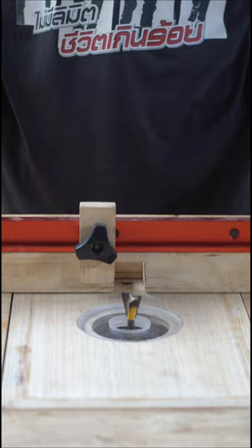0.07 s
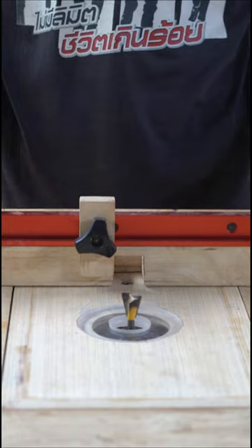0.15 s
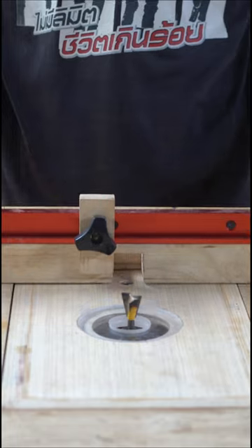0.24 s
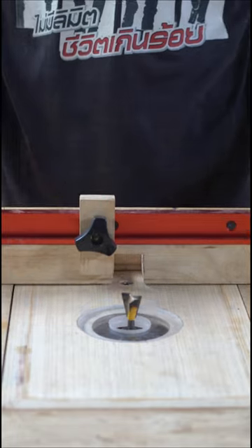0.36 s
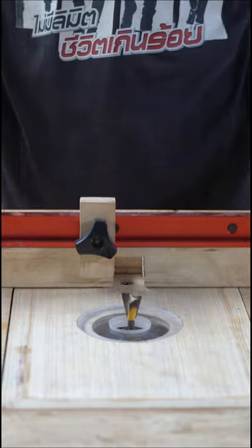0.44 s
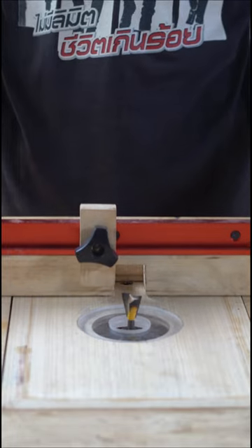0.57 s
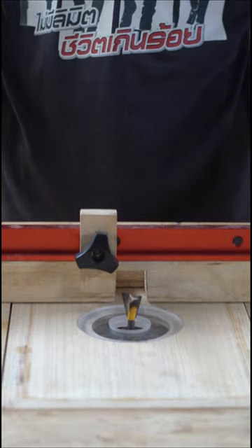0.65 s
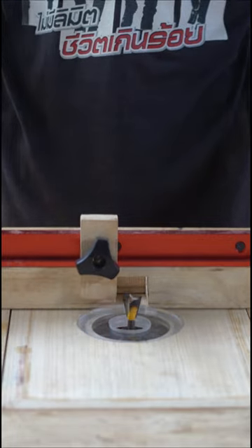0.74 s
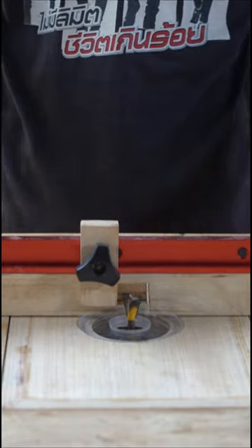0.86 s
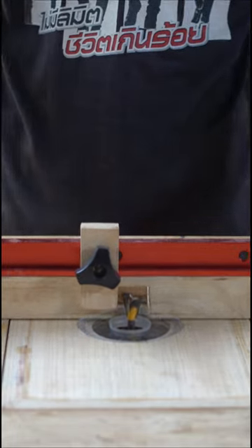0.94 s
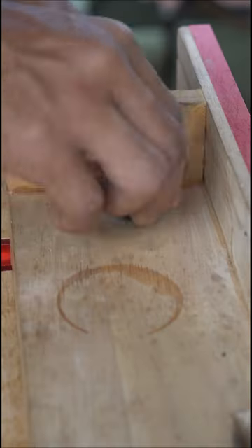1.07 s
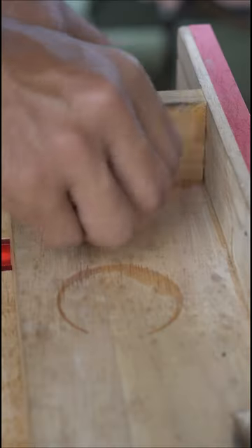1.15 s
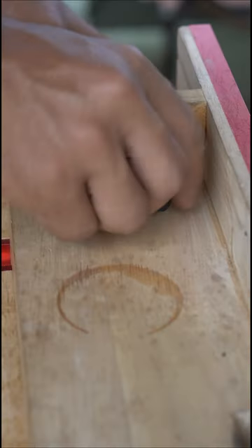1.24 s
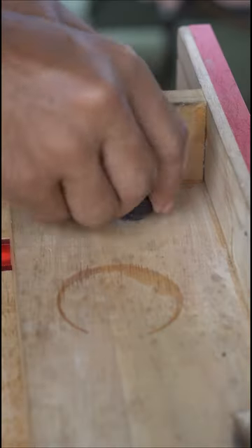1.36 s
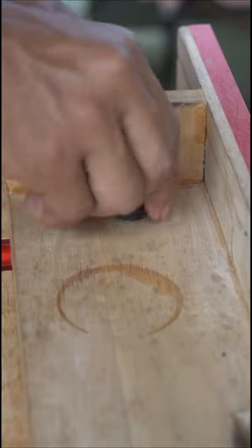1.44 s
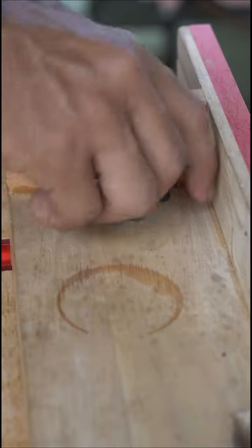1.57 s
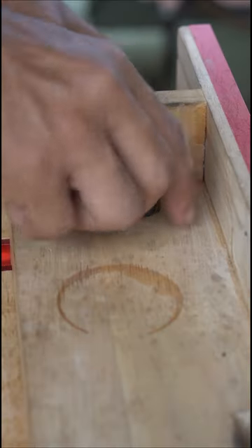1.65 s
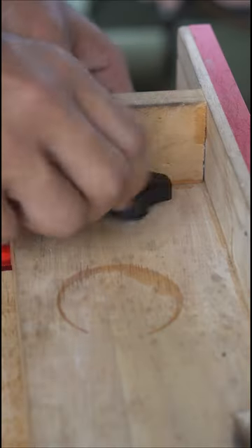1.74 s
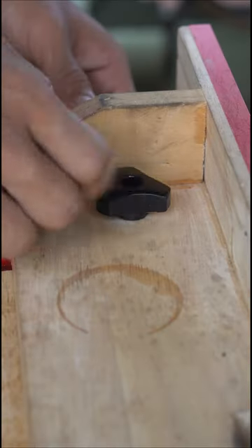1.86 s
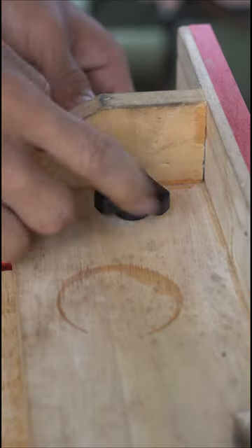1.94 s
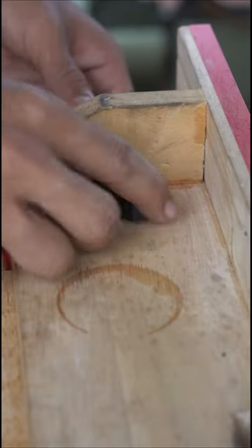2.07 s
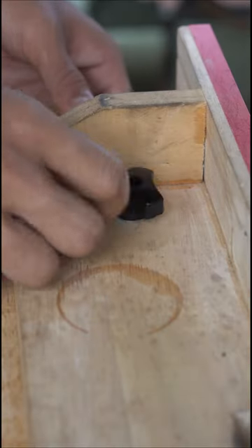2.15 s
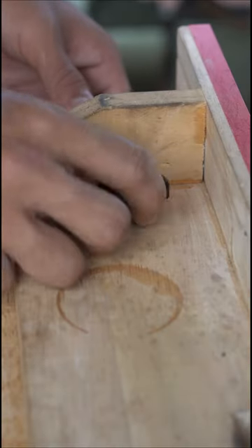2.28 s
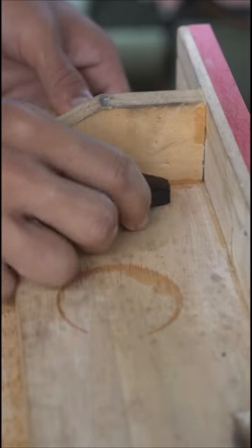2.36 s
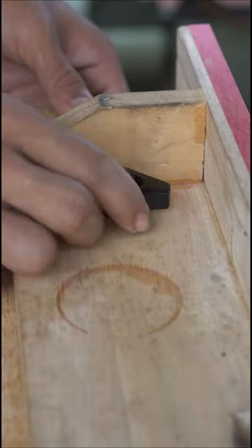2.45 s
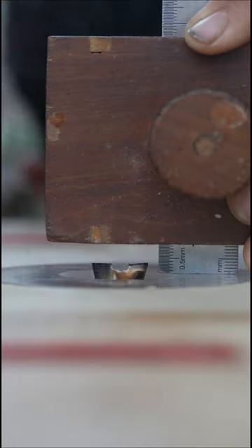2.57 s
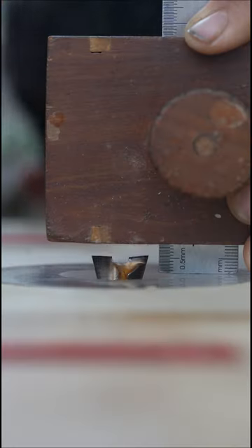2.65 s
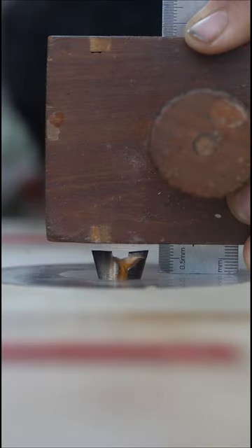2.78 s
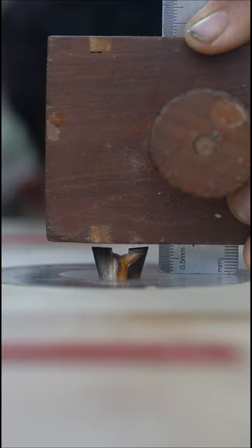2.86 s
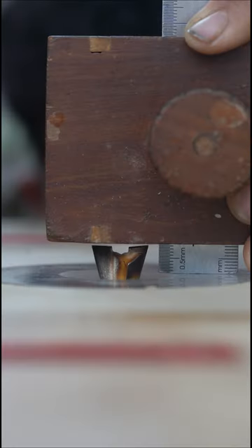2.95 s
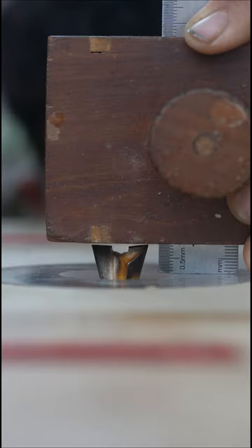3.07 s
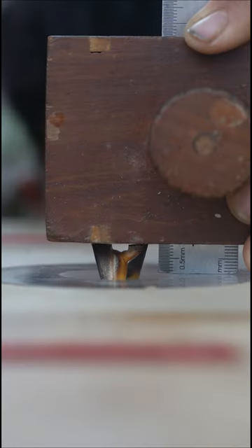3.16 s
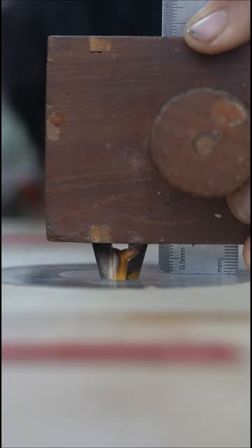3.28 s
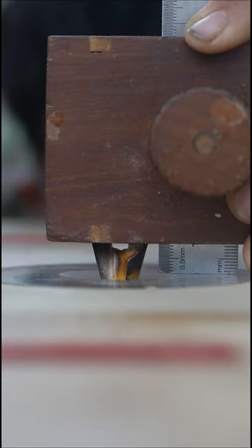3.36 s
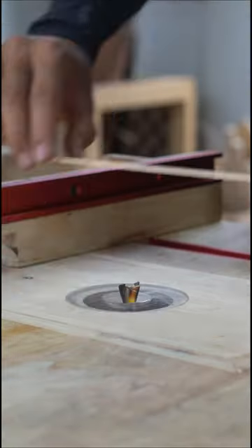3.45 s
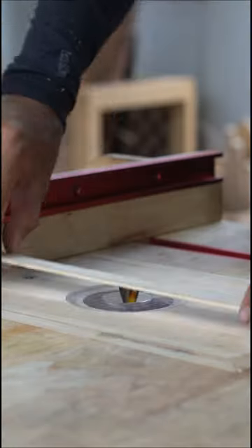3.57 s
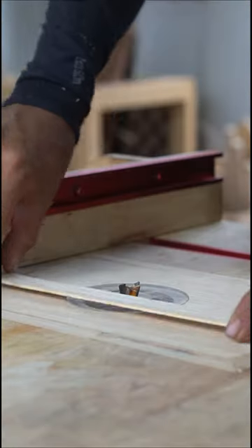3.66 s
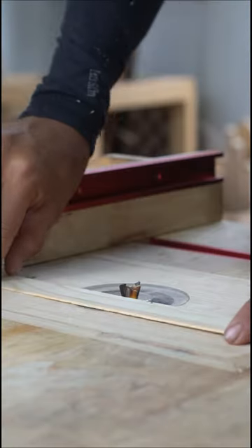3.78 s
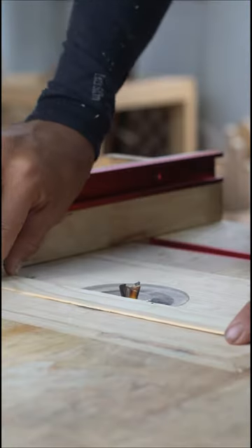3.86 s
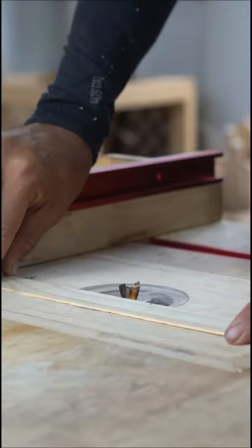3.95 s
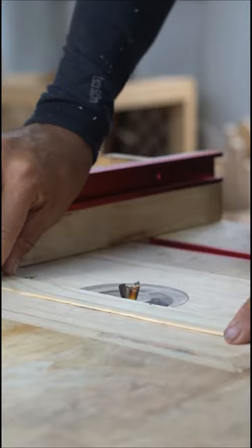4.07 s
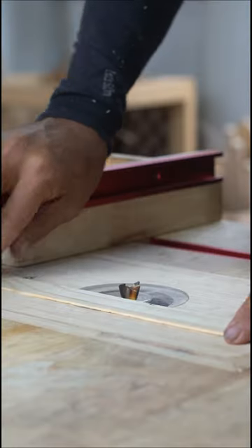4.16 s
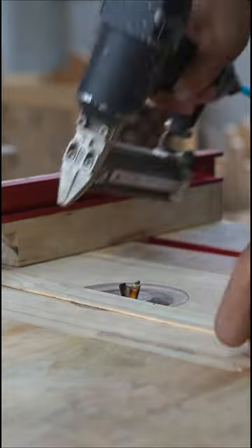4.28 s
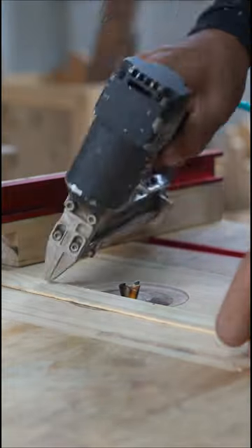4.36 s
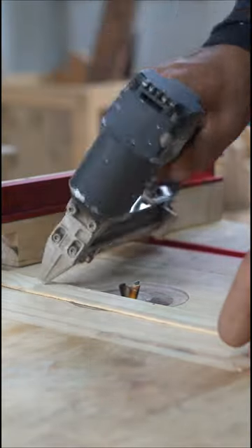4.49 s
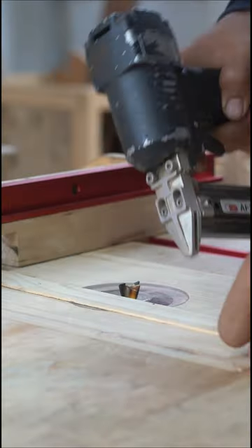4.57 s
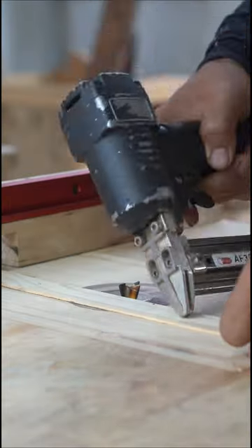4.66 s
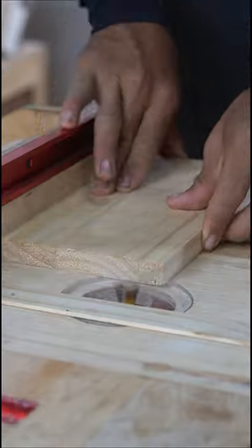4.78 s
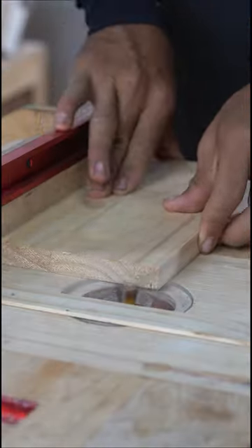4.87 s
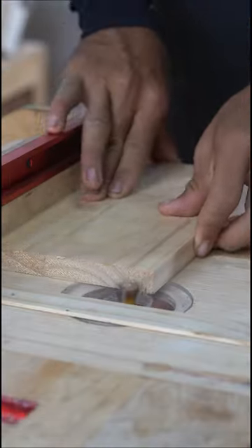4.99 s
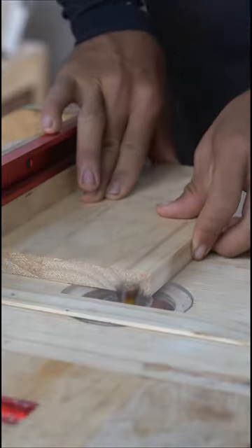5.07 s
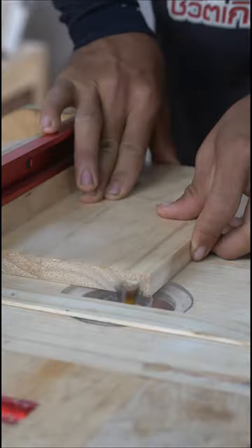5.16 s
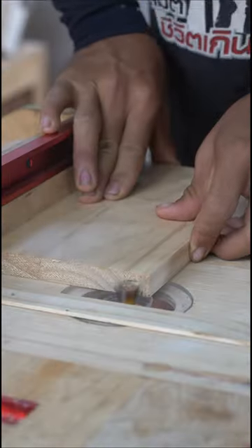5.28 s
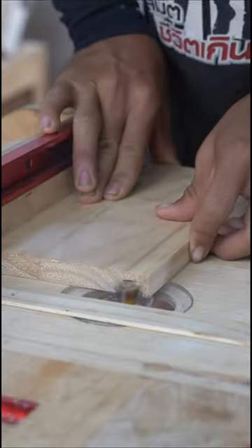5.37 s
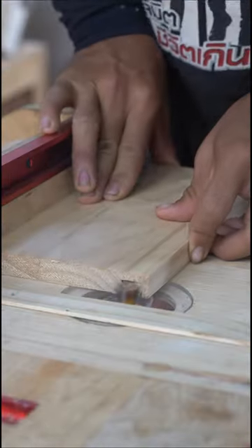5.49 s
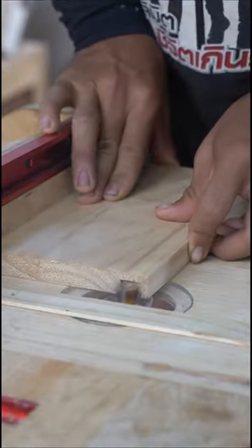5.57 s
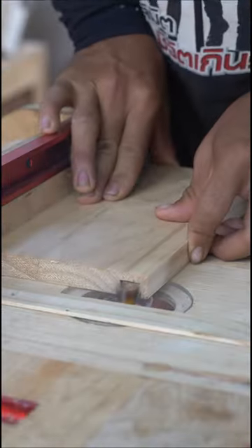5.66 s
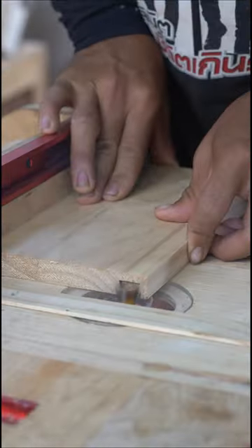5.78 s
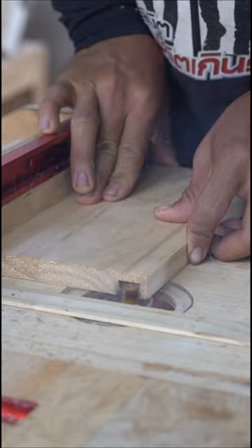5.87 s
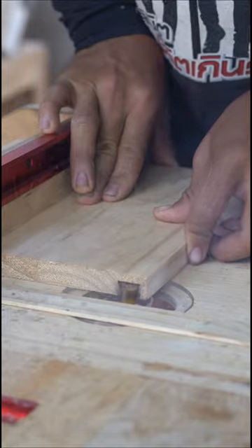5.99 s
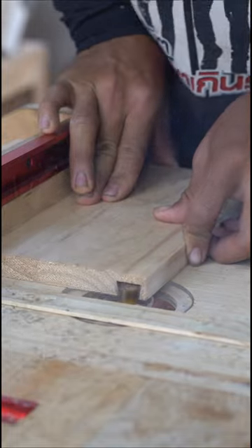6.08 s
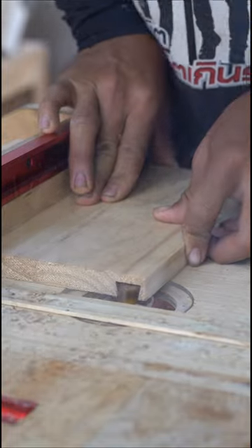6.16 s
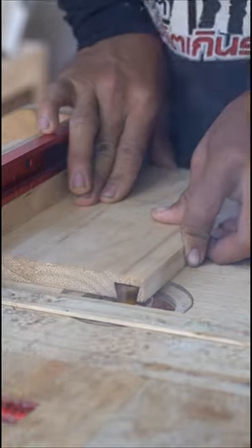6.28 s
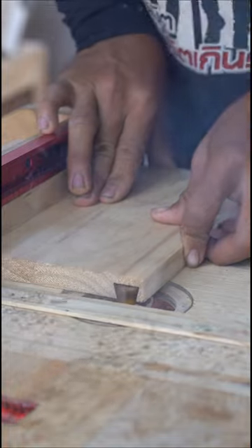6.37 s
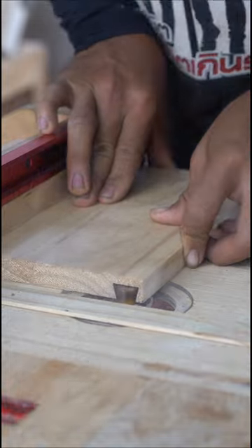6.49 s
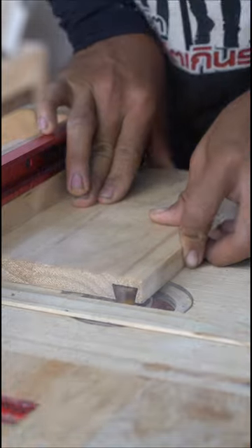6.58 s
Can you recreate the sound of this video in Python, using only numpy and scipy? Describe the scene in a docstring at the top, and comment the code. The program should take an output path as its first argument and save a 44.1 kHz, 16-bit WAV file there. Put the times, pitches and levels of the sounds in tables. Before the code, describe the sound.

Close mono sounds of a router table, in abruptly cut scenes: dry wood scraping, short knob clicks and rubbing, needle-thin squeaks with small steel rings, a light tap of a wood strip, and two hard nailer snaps. The final two seconds are far louder: a piercing motor whine in a rush of air and chips, dropping in pitch under load, then jumping higher and wavering deep in the cut.

```python
"""A router table is set up in a small workshop, then a dovetail slot is cut: a run of short scenes in mono.
First a fence rasps over the table as grainy bands of noise; then a clamp knob clicks with short noise bursts.
The bit squeaks in thin pure tones as it is raised, and a strip is tacked down with sharp cracks and a ping.
Last the router whines: tones locked to its two-flute bit, over a rush of air and chips, sag as it bites the board,
then sound deep in the slot, where the pitch rises and falls with the feed."""
import sys
import numpy as np
from scipy import signal
from scipy.fft import rfft, irfft, next_fast_len
from scipy.io import wavfile
from scipy.ndimage import uniform_filter1d

SR = 44100
rng = np.random.default_rng(int(sys.argv[2]) if len(sys.argv) > 2 else 0)


def bounce(signal):
    """Save signal as a 16-bit WAV file at the path given by the first command-line argument."""
    frames = np.transpose(np.atleast_2d(signal))
    limited = np.clip(frames, -1, 1)
    pcm = np.round(limited * 32767).astype(np.int16)
    wavfile.write(sys.argv[1], SR, pcm)


N = 292383  # samples
TIME = np.arange(N) / SR  # seconds

# Edges of the knob, gauge, strip and nailer scenes. Each entry: time in seconds; the last ends the nailer.
SCENE_EDGES = [1.104, 2.542, 3.501, 4.305, 4.781]
# Steady hiss of those four scenes. Each row: level in dB below 7 kHz, level in dB above.
SCENE_HISS = [(-49, -49), (-46.5, -45.5), (-45, -49.5), (-55, -55.5)]
# Tone colour of each scene's hiss. Each row: frequency in Hz, relative density in dB per Hz.
KNOB_COLOUR = [(88, -82), (150, -43.5), (422, -35), (675, -22), (979, -21), (1080, -15), (1260, -14),
               (1980, -8.5), (2360, -4), (3700, -3.5), (4000, -4.5), (5460, -4.5), (16000, -10.5)]
GAUGE_COLOUR = [(88, -84), (150, -46), (491, -19.5), (923, -17.5), (1100, -8), (1230, -13.5), (1770, -8.5),
                (1980, -5), (3390, -3.5), (6250, -5), (6880, -3), (14500, -1)]
STRIP_COLOUR = [(120, -73), (183, -27), (240, -50), (347, -30), (598, -20), (850, -17), (1230, -10),
                (1840, -4.5), (2160, -4.5), (2570, -4.5), (3990, -3), (4680, -7.5), (5200, -5),
                (16000, -17.5)]
NAILER_COLOUR = [(88, -99), (150, -73), (524, -32), (589, -33), (1120, -24), (1940, -15), (2550, -13.5),
                 (3160, -2), (3700, -11), (4410, -5), (5150, -10.5), (8900, -6.5), (16000, -12)]
# Hands and tools rub and lift the hiss.
# Each row: start in seconds, end in seconds, level in dB below 7 kHz, level in dB above.
RUBS = [(1.11, 2.175, -48.5, -54.5), (1.625, 2.17, -59, -49.5), (2.542, 2.696, -41.5, -33),
        (2.53, 2.915, -44, -38.5), (3.14, 3.183, -52, -40), (3.267, 3.38, -54, -46),
        (3.495, 3.53, -48, -44.5), (3.877, 3.92, -55, -48.5), (4.296, 4.54, -51.5, -49),
        (4.413, 4.48, -49.5, -55)]
# Narrow resonances in the hiss.
# Each row: start in seconds, end in seconds, centre in Hz, width in Hz, level in dB.
AIR_RESONANCES = [(0, 0.109, 6400, 220, -42), (0, 0.1, 9600, 700, -49), (0, 0.286, 3590, 200, -49),
                  (1.098, 2.54, 2440, 180, -68), (1.1, 1.8, 5450, 200, -66), (1.1, 1.797, 9900, 200, -63),
                  (3.507, 4.294, 1855, 180, -55.5), (3.5, 4.294, 2590, 170, -54.5),
                  (3.497, 4.302, 5140, 200, -59.5), (4.3, 4.784, 3280, 185, -69)]
# Faint hums of the workshop. Each row: start in seconds, end in seconds, frequency in Hz, mean level in dB.
HUMS = [(1.1, 1.9, 2298, -58), (1.49, 2.54, 1113, -71), (2.54, 3.5, 432, -79), (2.54, 3.3, 500, -78),
        (3.5, 4.3, 872, -68), (4.3, 6.63, 590, -85)]

# Tone colour of the sliding fence. Each row: frequency in Hz, relative density in dB per Hz.
FENCE_COLOUR = [(29, -78), (50, -28.5), (208, -21.5), (291, -2.5), (345, -10.5), (532, -1.5), (586, -1.5),
                (863, -5.5), (1470, -5), (2680, -8.5), (3500, -8), (5950, -11), (6870, -16.5), (11700, -24),
                (16000, -32.5)]
# Two pushes of the fence over the table.
# Each row: middle in seconds, half-length in seconds, then rumble, rasp and fine hiss levels in dB.
FENCE_PUSHES = [(0.05, 0.19, -72, -41, -53), (0.72, 0.22, -44.5, -39.5, -51.5)]
# Slow drag between pushes. The entries: rumble, rasp and fine hiss levels in dB.
FENCE_DRAG = (-44.5, -50.5, -55)
# Pitch of the fence's faint singing. Each row: time in seconds, frequency in Hz.
FENCE_SONG_PITCH = [(.28, 3490), (.5, 3310), (.72, 3144), (.92, 3540)]

# Sharp clicks of knob, gauge and nailer.
# Each row: time in seconds, ring level in dB, crack level in dB before halving, ring T60 in seconds, high edge in Hz.
CLICKS = [(1.193, -28, -32, 0.045, 10800), (1.332, -32.5, -32, 0.046, 7000), (1.844, -32, -24, 0.15, 15000),
          (1.909, -31.5, -19, 0.067, 15000), (1.947, -27.5, -36, 0.18, 8700),
          (1.974, -34, -15, 0.095, 15000), (2.0455, -29.5, -17, 0.053, 15000),
          (2.279, -34.5, -31, 0.085, 7000), (2.4717, -37.5, -34, 0.1, 15200),
          (3.171, -25, -35, 0.12, 12000), (3.223, -31, -29, 0.11, 6940), (4.358, -33.5, -14.5, 0.11, 12300),
          (4.524, -33.5, -12.5, 0.11, 15300)]
# Softer scuffs of wood and metal.
# Each row: time in seconds, level in dB, swell in seconds, T60 in seconds, low edge in Hz, high edge in Hz.
SCUFFS = [(0.521, -34, 0.016, 0.44, 330, 886), (1.06, -42.5, 0.02, 0.049, 252, 905),
          (1.251, -52, 0.004, 0.13, 764, 1800), (1.294, -35.5, 0.0077, 0.17, 2750, 5200),
          (1.31, -38, 0.025, 0.11, 1300, 10000), (1.312, -32.5, 0.021, 0.13, 2080, 2360),
          (2.285, -31, 0.015, 0.1, 5200, 14900), (3.323, -41.5, 0.0037, 0.084, 1010, 3500),
          (3.35, -27, 0.0075, 0.11, 2800, 14600), (4.226, -37.5, .0032, 0.17, 3000, 12900),
          (4.541, -28, 0.015, 0.1, 6540, 13200), (4.69, -52, 0.0015, 0.1, 820, 2080)]
# Brief steel rings at the gauge and the nailer's nose.
# Each row: time in seconds, frequency in Hz, peak level in dB, T60 in seconds.
PINGS = [(3.172, 6220, -27, .062), (3.222, 2250, -35, 0.061), (3.353, 4050, -32, 0.069),
         (4.525, 10380, -23, 0.11)]
# Dull bumps of the hands on the table. Each row: time in seconds, level in dB.
BUMPS = [(1.813, -56), (1.867, -60), (3.134, -56), (3.19, -58)]
# Thin squeaks while the bit is raised. Each row: start in seconds, end in seconds, frequency in Hz, level in dB.
SQUEAKS = [(2.553, 2.567, 15000, -22), (2.654, 2.671, 15150, -25), (2.671, 2.677, 15500, -28),
           (2.7455, 2.749, 15450, -26), (2.775, 2.895, 15432, -25.5), (3.249, 3.310, 15438, -26)]

# Whine pitch as the bit enters the board, then deep in the slot. Each row: time in seconds, frequency in Hz.
ENTRY_PITCH = [(4.79, 1855), (4.83, 1862), (4.95, 1871), (5.15, 1880), (5.24, 1880), (5.31, 1849),
               (5.39, 1793), (5.51, 1724), (5.63, 1681), (5.71, 1643), (5.78, 1626)]
DEEP_PITCH = [(5.787, 2795), (5.87, 2648), (5.93, 2588), (6.0, 2397), (6.04, 2396), (6.16, 2542),
              (6.2, 2532), (6.29, 2318), (6.355, 2220), (6.44, 2220), (6.48, 2286), (6.52, 2370),
              (6.56, 2390), (6.63, 2220)]
# Strongest partials, from the first upwards. Each entry: level in dB before the response below.
ENTRY_STRONG = [-36, -35.5, -33, -21]
DEEP_STRONG = [-41, -35]
# Fixed peaks and nulls of the table and its reflections, crossed by gliding partials.
# Each row: centre in Hz, half-width in Hz, gain in dB.
ENTRY_RESPONSE = [(1690, 20, -9), (1786, 13, 6), (1887, 8, 10), (3258, 8, -7), (3300, 10, -14),
                  (3458, 50, -14), (3470, 138, 13), (3674, 31, 10), (3719, 11, 10), (4953, 74, 7),
                  (5124, 30, 7), (5264, 51, 7), (5609, 21, 8), (6595, 134, -13), (7007, 24, -7),
                  (7078, 17, -13), (7251, 300, -7), (7475, 23, -10)]
DEEP_RESPONSE = [(2384, 108, 5), (2471, 21, -9), (2539, 47, 6), (2759, 77, 11), (4432, 31, 11),
                 (4562, 67, 14), (4829, 220, 14), (5199, 98, 9), (5221, 30, -14), (5419, 27, 8)]
# Upper partials; those deep in the slot also vary with speed. Each row: multiple of the whine, level in dB.
ENTRY_UPPER = [(5, -29), (6, -35), (7, -35.5), (8, -33.5), (9, -39)]
DEEP_UPPER = [(3, -34), (4, -31), (5, -33.5), (6, -33), (7, -39)]
# Bearing tones beside the partials. Each row: multiple of the whine, level in dB.
BEARING_TONES = [(1.19, -55.5), (1.38, -53), (2.62, -50), (2.81, -48), (3.19, -56), (3.62, -64),
                 (4.19, -59), (4.62, -56), (4.811, -39)]
# In-between orders from unequal flutes under load.
# Each row: multiple of the whine, level in dB before the load or the depth gain.
ENTRY_BITE = [(1.5, -49.5), (2.5, -46), (3.5, -44.5), (4.5, -40.5), (5.5, -47), (6.5, -50), (7.5, -50),
              (8.5, -52)]
DEEP_BITE = [(.5, -68), (.75, -62), (1.25, -62), (1.5, -51) , (1.75, -52), (2.25, -57), (2.5, -46),
             (2.75, -52), (3.25, -52), (3.5, -45), (3.75, -45), (4.25, -46), (4.5, -42), (4.75, -43),
             (5.25, -47), (5.5, -44), (5.75, -45), (6.25, -49), (6.5, -44)]
# The bit grabs the wood and bites harder. Each row: start in seconds, end in seconds, load in dB.
GRABS = [(5.256, 5.302, 7.5), (5.368, 5.51, 6), (5.66, 5.786, -2.5)]
# Cooling air and flying chips. Each row: time in seconds, mean level in dB.
ENTRY_RUSH = [(4.78, -26.5), (4.92, -26), (5.08, -28), (5.25, -26), (5.45, -27), (5.6, -27), (5.78, -29)]
DEEP_RUSH = [(5.79, -28.5), (5.88, -35.5), (5.96, -29.5), (6.05, -35.5), (6.25, -33.5), (6.38, -37),
             (6.63, -38)]
# Tone colour of that rush. Each row: frequency in Hz, relative density in dB per Hz.
ENTRY_RUSH_COLOUR = [(30, -35), (300, -35.5), (600, -29), (1200, -18), (2500, -8), (5000, -2), (9000, 1.5),
                     (12000, -0.5), (15500, -1)]
DEEP_RUSH_COLOUR = [(30, -24), (400, -21), (1000, -18.5), (2000, -9), (3200, -10.5), (4500, 2), (7000, 0),
                    (10500, 4.5), (13500, 11.5), (15500, 3.5)]

RUB_ATTACK_S, RUB_T60_S = 0.016, 0.14
OPENING_END_S, OPENING_HISS_DB = 0.104, -46  # the first moment hisses more brightly
FENCE_SONG_DB = -11  # relative to the rasp
CLICK_SWELL_S, CLICK_LOW_HZ = 0.00083, 2550
SCUFF_CRACK_DB = -10  # first contact relative to the scuff, before halving
CRACK_T60_S, GRIT_DB = 0.009, 1.8  # decay of a contact's crack; graininess of its ring
PING_ATTACK_S = 0.00094
ENTRY_START_S, CONTACT_S, DEEP_START_S = 4.781, 5.255, 5.784  # bit spins freely, meets the board, is deep
BITE_DB = -6  # load of the steady bite
GRAB_ATTACK_S, GRAB_T60_S = 0.02, 0.11
CHATTER_DB = -57  # board chatter once per turn, before the grab load
FREE_FLUTTER_DB, CUT_FLUTTER_DB = 3, 1.3  # flutter of the strong partials when free; what cutting adds
DIP_START_S, DIP_DB, DIP_RECOVERY_S = 4.928, -5.5, 0.082  # the whine and rush dip abruptly and recover
EDGE_DB, EDGE_DB_PER_HZ, EDGE_AT_HZ = -1, 0.0167, 2480  # upper partials strengthen with speed in the slot
DEEP_BITE_DB = 4  # gain of the in-between orders deep in the slot
CUTOFF_HZ = 15750


def from_db(db):
    """Decibels to gain."""
    return 10 ** (np.asarray(db) / 20)


def rms_one(x):
    """Scale to unit rms."""
    return x / np.sqrt(np.mean(x ** 2) + 1e-20)


def in_time(rows):
    """Draw one sample-rate curve for each column after the time."""
    seconds, *columns = np.transpose(rows)
    return [np.interp(TIME, seconds, column) for column in columns]


def between(start, end):
    """A gate with millisecond edges."""
    return np.clip(np.minimum(TIME - start, end - TIME) * 1000 + 0.5, 0, 1)


def held(start, end, attack_s, t60):
    """Rise, hold until the end, then die away."""
    rise = np.clip((TIME - start) / attack_s, 0, 1)
    return rise * from_db(-60 * np.maximum(TIME - end, 0) / t60)


def drift(rate_hz):
    """Slow random wandering of unit spread: noise through two equal poles, drawn every 20 samples."""
    pole = np.exp(-40 * np.pi * rate_hz / SR)
    steps = rng.standard_normal(N // 20 + 2002)
    slow = signal.lfilter([1], [1, -2 * pole, pole * pole], steps)[2000:]  # skip the settling
    return np.interp(np.arange(N) / 20, np.arange(len(slow)), rms_one(slow))


def band(x, low_hz, high_hz):
    """Causal band-pass."""
    high_hz = min(high_hz, 0.45 * SR)
    edges = [min(low_hz, high_hz - 10), high_hz]
    return signal.sosfilt(signal.butter(2, edges, "band", fs=SR, output="sos"), x)


def noise(colour, ripple_db, splits=()):
    """Coloured noise, rippled by room reflections, parted at the given frequencies into bands of unit rms."""
    size = next_fast_len(N, real=True)
    hz = np.maximum(np.fft.rfftfreq(size, 1 / SR), 1)
    points, level = np.transpose(colour)
    grid = np.arange(0, SR / 2, 35)  # one random ripple value every 35 Hz
    ripple = np.interp(hz, grid, rng.standard_normal(len(grid)))
    gain = from_db(np.interp(np.log(hz), np.log(points), level) + ripple_db * ripple)
    spectrum = gain * rfft(rng.standard_normal(size))
    edges = [0, *splits, SR]
    return [rms_one(irfft(spectrum * (hz >= low) * (hz < high), size)[:N])
            for low, high in zip(edges, edges[1:])]


def workshop():
    """Each scene after the fence has its own hiss, lifted by rubbing; narrow noise bands add resonances."""
    rub_power = 0
    for start, end, *levels_db in RUBS:
        rub = from_db(levels_db)[:, None] * held(start, end, RUB_ATTACK_S, RUB_T60_S)
        rub_power = rub_power + rub ** 2
    out = 0
    colours = [KNOB_COLOUR, GAUGE_COLOUR, STRIP_COLOUR, NAILER_COLOUR]
    for start, end, hiss_db, colour in zip(SCENE_EDGES, SCENE_EDGES[1:], SCENE_HISS, colours):
        low_gain, high_gain = np.sqrt(from_db(hiss_db)[:, None] ** 2 + rub_power)
        low, high = noise(colour, ripple_db=3.5, splits=(7000,))
        shimmer = from_db(1.0 * drift(150))
        out = out + between(start, end) * (low_gain * low + high_gain * shimmer * high)
    for start, end, hz, width, db in AIR_RESONANCES:
        resonance = rms_one(band(rng.standard_normal(N), hz - width / 2, hz + width / 2))
        out = out + between(start, end) * from_db(db) * resonance
    return out


def hums():
    """Weak sine tones whose level wanders a little."""
    out = 0
    for start, end, hz, db in HUMS:
        tone = np.sqrt(2) * np.sin(2 * np.pi * hz * TIME)
        out = out + between(start, end) * from_db(db + 3 * drift(15)) * tone
    return out


def fence(song_width_hz=260):
    """Wood slides on wood: a grainy rumble, more rasp with each push, and a wandering narrow band of friction."""
    bands = noise(FENCE_COLOUR, ripple_db=2.5, splits=(1500, 7000))
    power = from_db(FENCE_DRAG)[:, None] ** 2
    for middle, half, *levels_db in FENCE_PUSHES:
        push = from_db(levels_db)[:, None] * np.exp(-0.5 * ((TIME - middle) / half) ** 2)
        power = power + push ** 2
    rumble, rasp, hiss = np.sqrt(power)
    hiss = hiss + from_db(OPENING_HISS_DB) * between(-1, OPENING_END_S)
    grain = from_db(0.46 * drift(140))
    slide = grain * sum(gain * part for gain, part in zip((rumble, rasp, hiss), bands))
    angle = 2 * np.pi * np.cumsum(in_time(FENCE_SONG_PITCH)[0]) / SR
    # two independent drifts spread the tone into a narrow band
    friction = drift(song_width_hz / 2) * np.sin(angle) + drift(song_width_hz / 2) * np.cos(angle)
    song = from_db(FENCE_SONG_DB) * rasp * friction
    return between(-1, SCENE_EDGES[0]) * (song + slide)


def knocks(thud_db=-27):
    """Clicks and scuffs: a short crack, a dense gritty ring that swells and dies, and a faint thud of the table."""
    out, size = np.zeros(N), SR // 3
    t = np.arange(size) / SR
    clicks = [(s, db, CLICK_SWELL_S, t60, CLICK_LOW_HZ, high_hz, crack_db)
              for s, db, crack_db, t60, high_hz in CLICKS]
    scuffs = [(s, db, *shape, db + SCUFF_CRACK_DB) for s, db, *shape in SCUFFS]
    for s, body_db, swell, t60, low_hz, high_hz, crack_db in clicks + scuffs:
        grit = rng.standard_normal(size) * from_db(GRIT_DB * rng.standard_normal(size))
        shape = from_db(body_db - 60 * np.maximum(t - swell, 0) / t60) * np.minimum(t / swell, 1)
        burst = rms_one(band(rng.standard_normal(size), low_hz, high_hz))
        crack = 0.5 * from_db(crack_db - 60 * t / CRACK_T60_S) * burst
        ring = rms_one(band(grit, low_hz, high_hz))
        thud = from_db(thud_db) * rms_one(band(grit, 720, 4300))
        at = int(s * SR)
        out[at:at + size] += crack + shape * (ring + thud)
    return out


def pings():
    """Struck steel rings as single sines that die away exponentially."""
    out = 0
    for s, hz, db, t60 in PINGS:
        age = np.maximum(TIME - s, 0)
        attack = np.minimum(age / PING_ATTACK_S, 1)
        out = out + attack * from_db(db - 60 * age / t60) * np.sin(2 * np.pi * hz * age)
    return out


def hand_bumps(t60=0.095):
    """Hands bump the wooden top: low-mid noise under softened, decaying blows."""
    blows = sum(between(s, np.inf) * from_db(db - 60 * np.maximum(TIME - s, 0) / t60) for s, db in BUMPS)
    wood = rms_one(band(rng.standard_normal(N), 260, 750))
    return wood * uniform_filter1d(blows, size=SR // 200)


def squeaks():
    """Pure tones that catch and let go abruptly."""
    return sum(between(start, end) * from_db(db) * np.sqrt(2) * np.sin(2 * np.pi * hz * TIME)
               for start, end, hz, db in SQUEAKS)


def through(response, hz, levels_db):
    """Level of each partial as it glides through fixed peaks and nulls."""
    out = []
    for order, db in enumerate(levels_db, 1):
        gain_db = sum(peak_db * np.exp(-((order * hz - centre) / width) ** 2)
                      for centre, width, peak_db in response)
        out.append((order, db + gain_db))
    return out


def partials(hz, orders, fade_db, fade_rate, scatter, scatter_hz):
    """Tones locked to the spindle; each fades on its own, with a skirt of scatter that grows with its order."""
    out, angle = 0, 2 * np.pi * np.cumsum(hz) / SR
    for order, db in orders:
        skirt = scatter * order
        direct = from_db(fade_db * np.tanh(drift(fade_rate))) + skirt * drift(scatter_hz)
        tone = direct * np.sin(order * angle + rng.uniform(0, 2 * np.pi))
        tone = tone + skirt * drift(scatter_hz) * np.cos(order * angle)
        out = out + from_db(db) * rms_one(tone)
    return out


def router_entry():
    """The bit spins freely, then meets the board and slows; its flutes bite unequally and now and then grab."""
    pitch = in_time(ENTRY_PITCH)[0]
    hz = pitch * (1 + 0.0008 * drift(30))
    grab = sum(from_db(db) * held(start, end, GRAB_ATTACK_S, GRAB_T60_S) for start, end, db in GRABS)
    cutting = held(CONTACT_S, DEEP_START_S, GRAB_ATTACK_S, GRAB_T60_S)
    load = np.hypot(grab, from_db(BITE_DB) * cutting)
    shake = 0.025 + 0.04 * load
    flutter_db = FREE_FLUTTER_DB + CUT_FLUTTER_DB * cutting
    levels = through(ENTRY_RESPONSE, pitch, ENTRY_STRONG)
    strong = partials(hz, levels, fade_db=flutter_db, fade_rate=14, scatter=shake, scatter_hz=51.3)
    upper = partials(hz, ENTRY_UPPER, fade_db=5.5, fade_rate=23, scatter=0.064, scatter_hz=55)
    bearing = partials(hz, BEARING_TONES, fade_db=3, fade_rate=25, scatter=0.11, scatter_hz=40)
    bite = load * partials(hz, ENTRY_BITE, fade_db=4, fade_rate=24, scatter=0.39, scatter_hz=55)
    # two flutes: half the whine is one turn
    chatter = grab * partials(hz, [(0.5, CHATTER_DB)], fade_db=0, fade_rate=50, scatter=0.68, scatter_hz=55)
    rush_gain = from_db(in_time(ENTRY_RUSH)[0] + 0.85 * drift(90))
    rush = rush_gain * noise(ENTRY_RUSH_COLOUR, ripple_db=3.5)[0]
    recovery = np.exp(-np.abs(TIME - DIP_START_S) / DIP_RECOVERY_S)
    dip = from_db(DIP_DB * between(DIP_START_S, np.inf) * recovery)
    return between(ENTRY_START_S, DEEP_START_S) * dip * (strong + upper + bearing + bite + chatter + rush)


def router_deep():
    """Buried in the slot, the bit sings on its second partial and its speed follows the feed."""
    pitch = uniform_filter1d(in_time(DEEP_PITCH)[0], size=SR // 100)  # rounded over 10 ms
    hz = pitch * (1 + 0.001 * drift(30))
    levels = through(DEEP_RESPONSE, hz, DEEP_STRONG)
    strong = partials(hz, levels, fade_db=2.5, fade_rate=27, scatter=0.09, scatter_hz=78)
    upper = partials(hz, DEEP_UPPER, fade_db=4.5, fade_rate=28, scatter=0.07, scatter_hz=70)
    edge = from_db(EDGE_DB + EDGE_DB_PER_HZ * (hz - EDGE_AT_HZ))
    bite = partials(hz, DEEP_BITE, fade_db=5, fade_rate=20, scatter=0.12, scatter_hz=70)
    rush_gain = from_db(in_time(DEEP_RUSH)[0] + 1.4 * drift(90))
    rush = rush_gain * noise(DEEP_RUSH_COLOUR, ripple_db=4.5)[0]
    return between(DEEP_START_S, np.inf) * (strong + edge * upper + from_db(DEEP_BITE_DB) * bite + rush)


def scene():
    """All sources, alike in both channels."""
    background = workshop() + hums()
    setting_up = fence() + knocks() + pings() + hand_bumps() + squeaks()
    mono = background + setting_up + router_entry() + router_deep()
    return np.stack([mono, mono])


def record(dry):
    """A steep elliptic low-pass removes the extreme top."""
    return signal.sosfilt(signal.ellip(12, 0.1, 90, CUTOFF_HZ, fs=SR, output="sos"), dry)


dry = scene()
out = record(dry)
bounce(out)
```